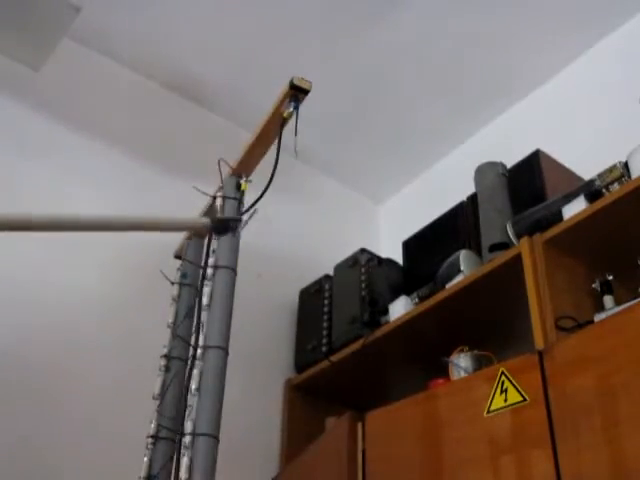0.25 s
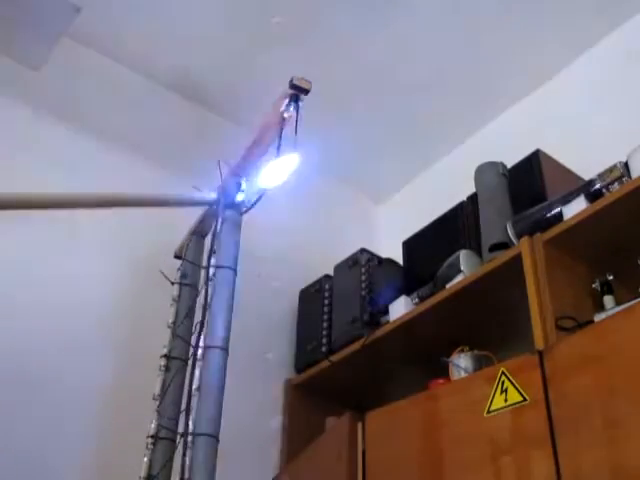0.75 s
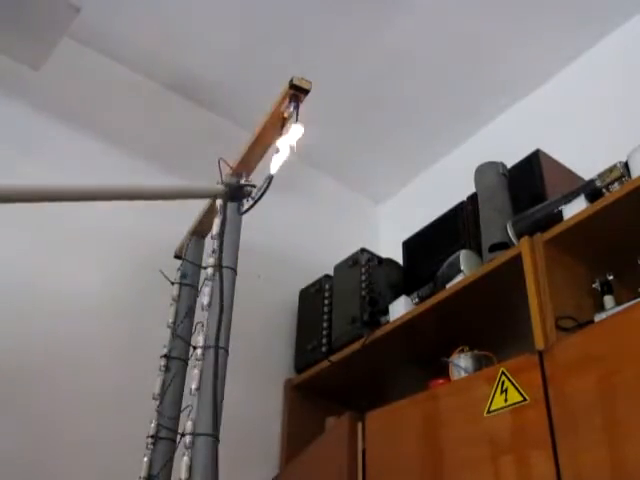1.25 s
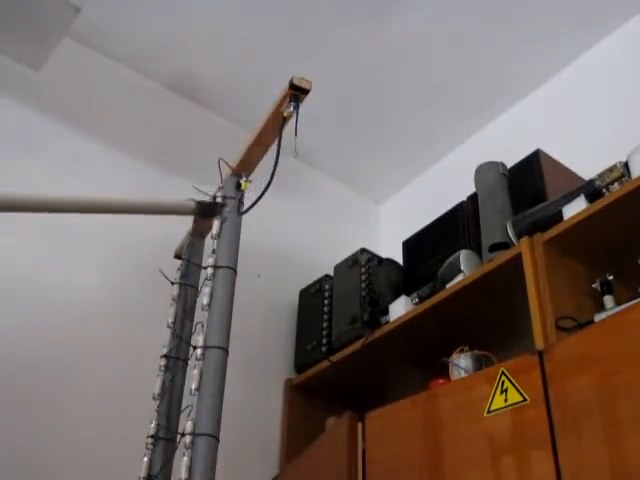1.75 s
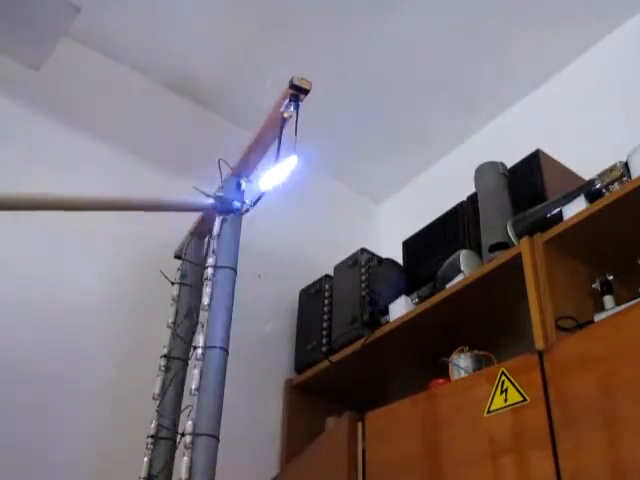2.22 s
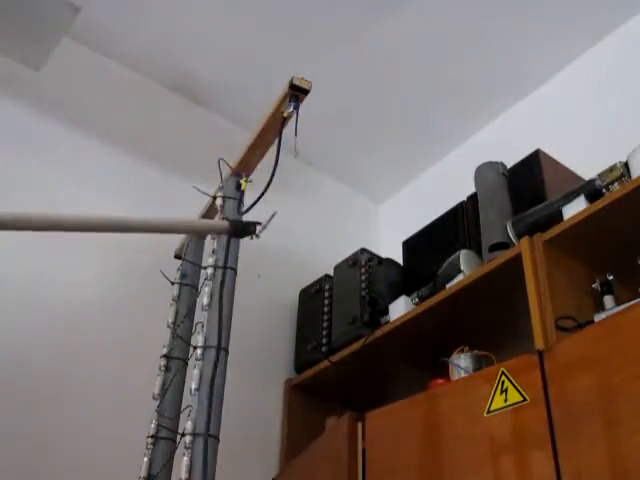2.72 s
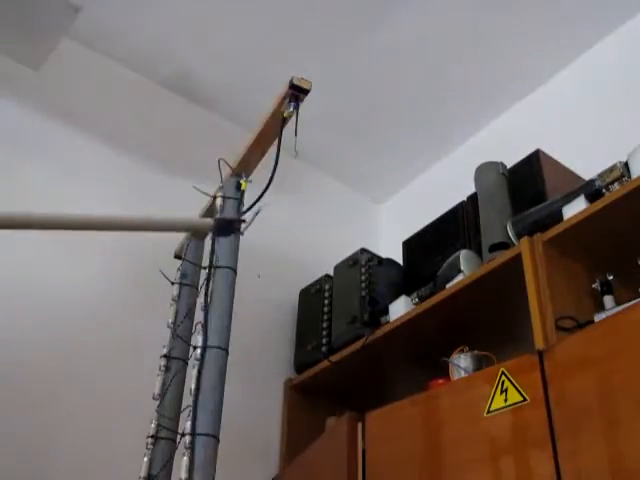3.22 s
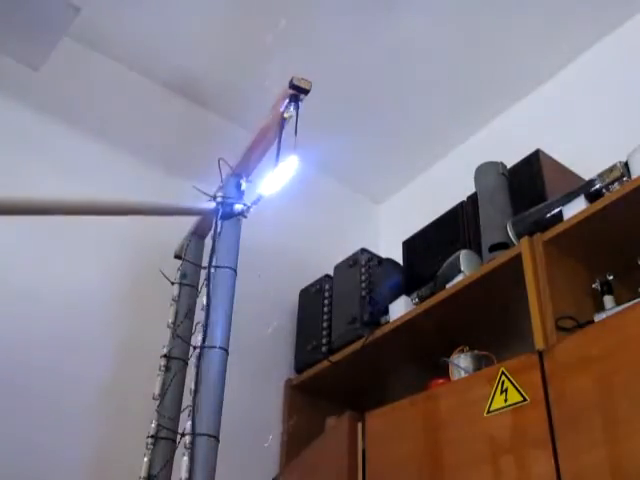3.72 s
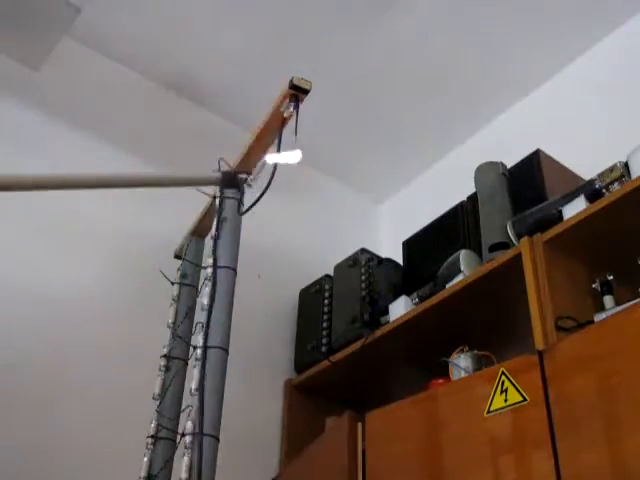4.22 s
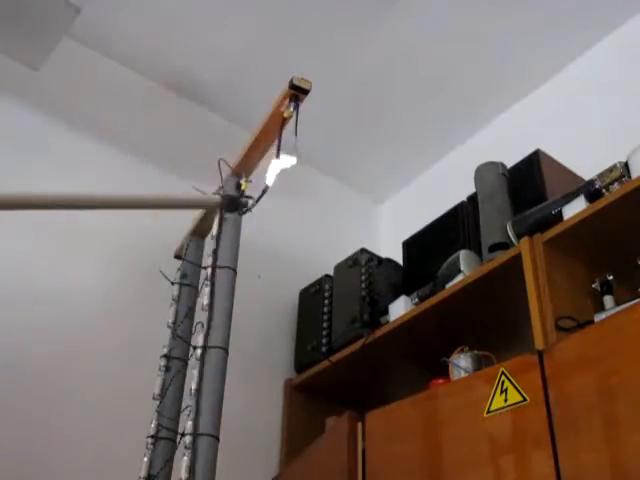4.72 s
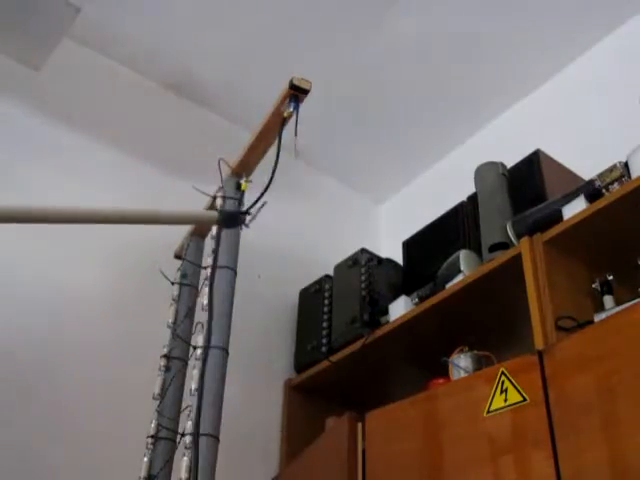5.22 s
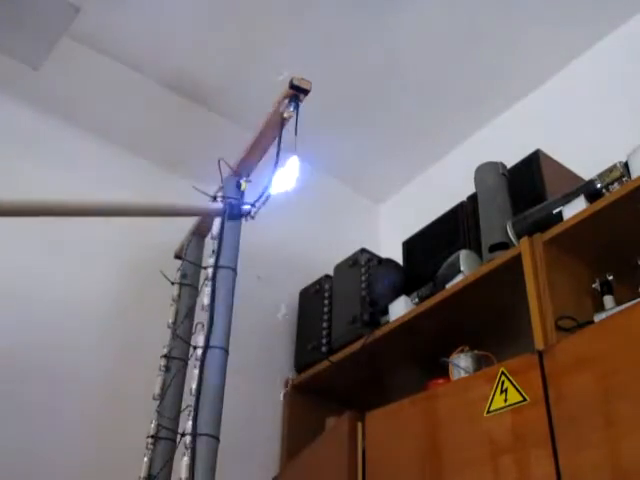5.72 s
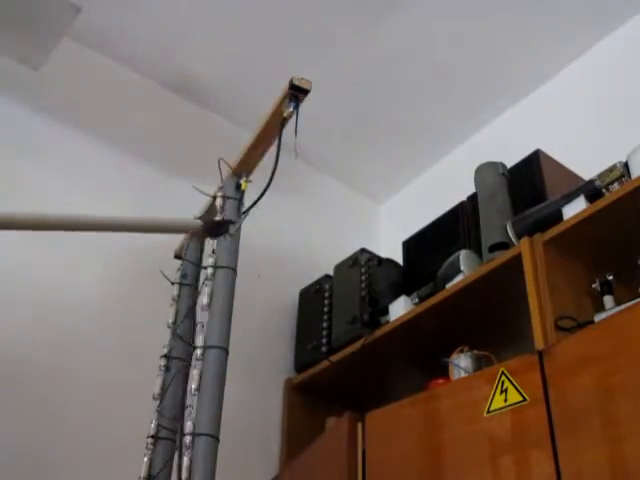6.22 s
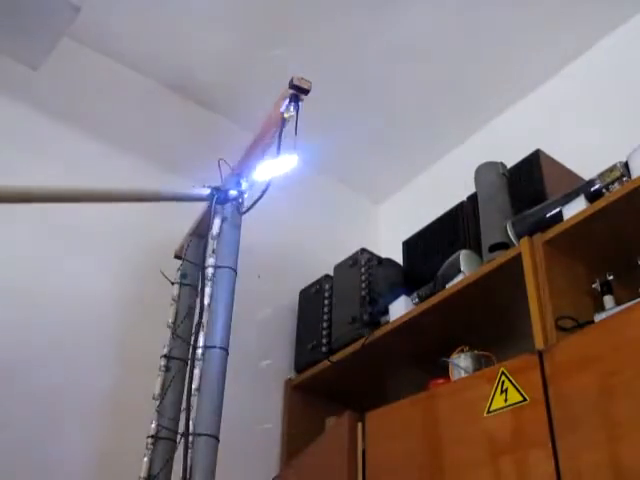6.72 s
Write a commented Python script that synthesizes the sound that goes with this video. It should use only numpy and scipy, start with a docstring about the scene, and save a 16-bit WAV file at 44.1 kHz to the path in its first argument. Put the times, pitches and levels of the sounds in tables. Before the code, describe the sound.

Irregular electrical sparking close up: dry short zaps alternate with long tearing buzzes, popping the microphone, over near silence in a live room.

```python
"""In a small, hard-walled room a homemade high-voltage supply arcs across a gap, close to a camera.
Short spits of uneven sparks alternate with long roaring arcs of thousands of sparks a second.
Now and then the sparks lock to the supply's oscillator and whistle; faint ticks and low tones join in.
Strong discharges couple into the microphone amplifier, which answers with dull pops.
Each spark is a click that rings the rig, then reaches two close-set microphones through the room."""
import sys
import numpy as np
from scipy import signal
from scipy.fft import rfft, irfft
from scipy.io import wavfile
from scipy.ndimage import uniform_filter1d

SR = 44100
rng = np.random.default_rng(int(sys.argv[2]) if len(sys.argv) > 2 else 0)


def wav_record(signal):
    """Record a signal, one row per channel, as 16-bit PCM in the file named by sys.argv[1]."""
    frames = np.transpose(np.atleast_2d(signal))
    bounded = np.clip(frames, -1, 1)
    # unit amplitude maps onto the largest positive 16-bit level
    quanta = np.round(bounded * 32767).astype(np.int16)
    wavfile.write(sys.argv[1], SR, quanta)


N = 306495
TIME = np.arange(N) / SR

# Long arcs across the gap. Each row: start in seconds, end in seconds, relative level in dB,
# swell time in seconds, fade time in seconds.
ARCS = [(0.574, 0.761, -14, 0.0027, 0.077), (2.04, 2.344, -15.5, 0.0016, 0.023),
        (2.641, 3.03, -12.5, 0.075, 0.21), (3.332, 3.999, -15, 0.0064, 0.038),
        (5.53, 5.896, -15, .03, 0.16), (6.397, 6.755, -14.5, 0.0022, 0.066)]
# sparks a second at the median wait, in the thinnest and the densest spits
THIN_PER_S, DENSE_PER_S = 800, 2200
# delay in samples that leaves room for the casing's smear ahead of the direct sound
LEAD = 32


def amp(db):
    """Decibels to gain."""
    return 10 ** (np.asarray(db) / 20)


def evened(x):
    """Scales to rms 1."""
    return x / np.sqrt(np.mean(x ** 2) + 1e-20)


def read(points, hz):
    """Reads a table on a log-frequency axis."""
    f, value = np.transpose(points)
    return np.interp(np.log(hz + 1), np.log(f + 1), value)


def add(mix, s, sound):
    """Mixes a sound in at time s."""
    part = mix[..., max(round(s * SR), 0):][..., :sound.shape[-1]]
    part += sound[..., :part.shape[-1]]


def floor(level_db=-64):
    """Faint steady room noise and amplifier hiss, partly shared by the two microphones."""
    # Colour of the quiet room and the hiss. Each row: frequency in Hz, relative level in dB per Hz.
    quiet_colour = [(10, -26), (26, -4.5), (50, -15), (95, -21), (150, -10), (260, -18.5), (500, -15.5),
                    (1400, -23.5), (3000, -21), (6000, -22.5), (12000, -29.5), (16000, -35.5)]
    gain = amp(read(quiet_colour, np.fft.rfftfreq(N, 1 / SR)))
    noise = irfft(rfft(rng.standard_normal((3, N))) * gain, N)
    own, shared = noise[:2], noise[2]
    return amp(level_db) * evened(own + 0.5 * shared)


def sparks(length, rate, jitter, spread_db):
    """The gap charges and breaks down again at uneven intervals; a longer wait gives a stronger spark."""
    count = 6000
    wait, luck = rng.standard_normal((count, 2)).T
    wait = np.exp(jitter * wait)  # median 1, so rate is the inverse of the median wait
    at = np.round((np.cumsum(wait) - wait[0]) / rate * SR).astype(int)  # the first spark is at once
    strength = np.sqrt(wait) * amp(spread_db * luck)
    n = max(round(length * SR), 2)
    inside = at < n
    return np.bincount(at[inside], strength[inside], n)


def spits(first_db=-12):
    """Each spit swells as its sparks stretch, then breaks off; the brighter it is, the faster it sparks."""
    # Short spits. Each row: start in seconds, length in seconds, relative level in dB,
    # share of dense bright sparks from 0 to 1.
    bursts = [(.054, .008, -21.5, 0.1), (0.084, 0.0097, -19, .4), (1.083, 0.0049, -27.5, 0.82),
              (1.147, 0.0069, -41, .4), (1.223, 0.0057, -21.5, 0.18), (1.414, 0.0086, -18.5, 0.53),
              (1.467, 0.012, -26, 0.62), (1.544, .014, -21, 0.29), (1.574, .02, -24, .7),
              (2.0007, .0086, -10.5, 0.36), (4.335, 0.0093, -26.5, 0.48), (4.354, .024, -30, 0.86),
              (4.489, 0.0086, -22.5, 0.89), (4.572, 0.0054, -37, 0.87), (4.723, .003, -46.5, 0.13),
              (4.886, 0.0073, -23, 0.57), (4.952, .017, -22.5, .5), (4.972, 0.033, -20.5, 1),
              (5.1256, 0.0033, -16.5, 0.54), (5.131, 0.024, -20.5, 0.98), (5.512, 0.0038, -15.5, 0.47),
              (6.869, 0.012, -23, 0.75), (6.913, 0.012, -18.5, 0.87), (6.925, 0.02, -18, 0.97)]
    thin, dense = np.zeros((2, N))
    for start, length, db, share in bursts:
        share = np.clip(share, 0, 1)
        rate = THIN_PER_S * (DENSE_PER_S / THIN_PER_S) ** share
        train = sparks(length, rate, jitter=.55, spread_db=2)
        swell = amp(np.linspace(first_db, 0, len(train)))
        train = amp(db) * evened(train * swell)
        add(thin, start, (1 - share) * train)
        add(dense, start, share * train)
    return thin, dense


def crack(clicks, colour, size=4096):
    """Turns each click into a sharp causal crack of unit energy that rings the nearby resonances."""
    # Resonances and dips of the rig and its surroundings. Each row: frequency in Hz, width in Hz,
    # lift in dB.
    body = [(573, 150, 3), (1755, 65, -3), (2576, 210, 2), (3030, 50, 1.5), (3460, 210, -1),
            (4194, 110, 6.5), (4270, 60, -1.5), (5040, 130, 3.5), (5610, 76, 4), (6000, 42, 8),
            (6750, 77, -9)]
    hz = abs(np.fft.fftfreq(size, 1 / SR))
    db = read(colour, hz)
    for f, width, lift in body:
        db = db + lift / (1 + (2 * (hz - f) / width) ** 2)
    # minimum phase puts the energy right after the click
    spectrum = np.exp(np.conj(signal.hilbert(np.log(amp(db)))))
    shape = np.fft.ifft(spectrum).real[:size // 2]
    return signal.oaconvolve(clicks, shape / np.linalg.norm(shape))[:N]


def casing(scatter=0.65, scatter_s=0.00038, above_hz=3100, size=512):
    """Treble scatters off the camera body and reaches each microphone smeared in its own way."""
    response = scatter * rng.standard_normal((2, size)) * np.exp(-TIME[:size] / scatter_s)
    highpass = signal.butter(4, above_hz, "high", fs=SR, output="sos")
    response = signal.sosfilt(highpass, response)
    response[:, 0] += 1
    z = rfft(np.roll(response, LEAD, axis=1))
    return irfft(z / (abs(z) + 1e-9))  # the smear leaves the colour as it is


def room(x, tail_db, direct_db=-4, gap_s=0.0013, low_hz=45):
    """One path to the camera: direct sound, near reflections and a diffuse tail that differs by microphone."""
    # Decay of the room. Each row: frequency in Hz, time to fall 60 dB in seconds.
    decay = [(150, 0.08), (400, 0.19), (1000, 0.37), (2800, 0.34), (7000, 0.36), (11000, 0.33),
             (16000, 0.26)]
    # Likeness of the tail at the two close-set microphones. Each row: frequency in Hz,
    # likeness from 0 to 1.
    likeness = [(100, 1), (900, 0.83), (1900, 0.8), (2700, 0.4), (4000, 0.03)]
    # Near reflections. Each row: delay in seconds, left gain, right gain, both relative to the direct sound.
    reflections = [(.000408, 0.064, 0.18), (.000726, 0.061, 0.3), (.00113, 0.05, 0.12),
                   (.00229, 0.055, 0.75), (.0029, .25, 1), (.00846, 0.22, 0.56)]
    # scattered taps of random sign, faded at each frequency by the room's decay
    count, step = 1500, 14
    taps = np.zeros((2, count * step))
    at = np.arange(count) * step + rng.integers(0, step, (2, count))
    np.put_along_axis(taps, at, rng.choice([-1., 1.], at.shape), 1)
    hz, t, z = signal.stft(taps, SR, nperseg=256)
    z = z * amp(-60 * t / read(decay, hz)[:, None])
    alike = np.clip(read(likeness, hz), 0, 1)[:, None]
    z[1] = alike * z[0] + np.sqrt(1 - alike ** 2) * z[1]
    tail = signal.istft(z, SR)[1]
    tail = tail * (1 - np.exp(-(TIME[:tail.shape[1]] / gap_s) ** 2))  # the tail builds up late
    response = amp(tail_db) * tail / np.linalg.norm(tail, axis=1, keepdims=True)
    response[:, 0] += amp(direct_db)
    for delay, *sides in reflections:
        add(response, delay, amp(direct_db) * np.array(sides)[:, None])
    response = signal.fftconvolve(response, casing(), axes=1)
    # a spark radiates no steady pressure
    highpass = signal.butter(2, low_hz, "high", fs=SR, output="sos")
    response = signal.sosfilt(highpass, response)
    return signal.fftconvolve(x[None], response, axes=1)[:, LEAD:N + LEAD]


def ticks(length_s=.004, level_db=-52.5):
    """A few feeble sparks that fail to bridge the gap."""
    # Faint ticks, where the gap nearly breaks down. Each entry: start in seconds.
    starts = [.533, .557, 1.054, 1.946, 5.479]
    out = np.zeros(N)
    for start in starts:
        train = sparks(length_s, THIN_PER_S, jitter=.55, spread_db=2)
        add(out, start, amp(level_db) * evened(train))
    return out


def arc_level(t, length, db, swell_s, fade_s, swell_db=-4, sag_db=-5.5, out_db_per_s=-600):
    """Level in dB of an arc t seconds after its strike: it starts weak, holds, sags as it stretches, goes out."""
    swell = swell_db * np.exp(-t / swell_s)
    sag = sag_db * np.clip(1 - (length - t) / fade_s, 0, 1)
    return db + swell + sag + out_db_per_s * np.maximum(t - length, 0)


def arcs(rate=2400, strike_db=24, flutter_db=0.93, flutter_s=.008):
    """A first hard strike, then thousands of sparks a second whose strength flutters."""
    out = np.zeros(N)
    for start, end, *shape in ARCS:
        train = sparks(end - start + .06, rate, jitter=.6, spread_db=3)  # runs on while the arc goes out
        noise = rng.standard_normal(SR)
        flutter = evened(uniform_filter1d(noise, max(int(flutter_s * SR), 1)))[:len(train)]
        train = evened(train * amp(flutter_db * flutter))
        train[0] = amp(strike_db)
        level = arc_level(TIME[:len(train)], end - start, *shape)
        add(out, start, train * amp(level))
    return out


def pop(hold_s, left, release_s=0.0013):
    """A discharge throws the amplifier to one side; it sticks, then lets go."""
    late = np.maximum(TIME[:SR // 20] - hold_s, 0)
    sides = np.array([[np.clip(left, 0, 1)], [1]])
    return -sides * np.exp(-(late / release_s) ** 2)


def pops(full_height=.57, coupling_hz=14, lesser_hold_s=.0007, small_per_s=150, small_db=-19, left_db=-7):
    """Full pops, spells of lesser ones and small kicks, all overshooting through the coupling capacitor."""
    # Full pops. Each row: start in seconds, time spent saturated in seconds,
    # share that reaches the left from 0 to 1.
    full = [(0.611, .0016, 0.54), (2.01, 0.00044, 0.09), (2.1846, .0005, 0), (2.189, 0.0012, 0.02),
            (2.219, 0.00036, 0), (2.2524, 0.00028, .05), (2.3163, 0.0016, 0), (2.6594, 0.0015, 0),
            (2.6974, 0.00048, 0), (3, .0006, 0.25), (3.3441, 0.0036, 0), (3.636, .0004, 0.48),
            (3.6983, .0014, 0.6), (3.8123, .0005, 0.3), (4.9998, 0.0012, 0.08), (5.1407, 0.0029, 0),
            (5.539, 0.00097, 0), (5.6385, 0.0012, 0), (5.7373, 0.00075, 0), (5.7857, 0.002, 0),
            (5.8379, .0002, 0), (5.8609, .0008, 0.01), (6.461, 0.00026, 0.52), (6.4988, 0.0013, 0.43),
            (6.5221, .0013, .8), (6.6522, 0.00037, .75), (6.6865, 0.0014, 0.66), (6.7125, 0.00034, 1),
            (6.7349, 0.0015, 1), (6.8674, 0.0043, 0.8), (6.9194, 0.0043, .8), (6.9361, 0.0046, 0),
            (6.9457, .0046, 1)]
    # Spells of lesser pops at random moments. Each row: start in seconds, end in seconds,
    # pops a second at the median wait, typical height, share that reaches the left from 0 to 1.
    spells = [(2.051, 2.34, 17, 0.29, 0.22), (2.676, 2.78, 29, 0.4, 0), (3.351, 3.52, 39.6, 0.37, 0.01),
              (3.748, 3.83, 38, 0.33, 0.2), (5.545, 5.8, 28, 0.34, 0.01), (6.612, 6.755, 70, 0.43, 0.33),
              (6.916, 6.944, 130, 0.41, 0.25)]
    out = np.zeros((2, N))
    for s, hold_s, left in full:
        add(out, s, full_height * pop(hold_s, left))
    for start, end, rate, height, left in spells:
        train = sparks(end - start, rate, jitter=.4, spread_db=2)
        lesser = signal.fftconvolve(train[None], pop(lesser_hold_s, left), axes=1)
        add(out, start, height * lesser)
    # weaker kicks come at random from an arc's strike until halfway through its fade, mostly on the right
    burning = sum((TIME > start) & (TIME < end - fade_s / 2) for start, end, _, _, fade_s in ARCS)
    struck = rng.random((2, N)) < small_per_s / SR
    kicks = burning * struck * rng.uniform(.3, 1, (2, N))
    recovery = np.exp(-TIME[:SR // 20] / 0.001)
    kicks = signal.oaconvolve(kicks, recovery[None])[:, :N]
    out -= amp(small_db) * amp([[left_db], [0]]) * kicks
    highpass = signal.butter(2, coupling_hz, "high", fs=SR, output="sos")
    return signal.sosfilt(highpass, out)


def hums(waver=0.023):
    """A soft, wavering low tone that swells and fades as the two whistling arcs die."""
    # Faint low tones. Each row: start in seconds, end in seconds, relative level in dB, pitch in Hz.
    tones = [(.72, .88, -48.5, 541), (3.92, 4.084, -49, 542)]
    out = np.zeros(N)
    for start, end, db, hz in tones:
        n = max(round((end - start) * SR), 2)
        drift = evened(uniform_filter1d(rng.standard_normal(SR), size=300))[:n]
        tone = np.sin(2 * np.pi * np.cumsum(hz * (1 + waver * drift)) / SR)
        add(out, start, amp(db) * evened(tone * np.hanning(n)))
    return out


def whistles(oscillator_hz=23850, octave_db=-6):
    """Sparks on every third or fourth cycle give an unsteady tone; the lower one has an audible octave."""
    # Whistles, where the sparks lock to the supply's oscillator. Each row: start in seconds,
    # end in seconds, relative level in dB, oscillator cycles per spark, rms pitch waver as a share.
    locked = [(.73, .87, -32, 3, .01), (.76, .845, -28, 4, .009), (.895, .93, -37, 4, .006),
              (3.98, 4.075, -30.5, 3, .008), (4.361, 4.379, -22, 3, .024), (4.366, 4.395, -17.5, 4, .04),
              (4.491, 4.505, -22, 4, .04)]
    out = np.zeros(N)
    for start, end, db, cycles, waver in locked:
        n = max(round((end - start) * SR), 2)
        hz = oscillator_hz / max(round(cycles), 2)
        noise = rng.standard_normal((2, SR // 4))
        drift, flicker = evened(uniform_filter1d(noise, size=45))[:, :n]
        phase = 2 * np.pi * np.cumsum(hz * (1 + waver * drift)) / SR
        octave = (cycles > 3.5) * amp(octave_db) * np.sin(2 * phase)
        tone = np.sin(phase) + octave
        envelope = (1 + .5 * flicker) * signal.windows.tukey(n, .5)
        add(out, start, amp(db) * evened(tone * envelope))
    return out


def scene(spit_db=2, arc_db=0, pop_db=0, left_db=1.4, count=3):
    """The spark channel jumps about, so each spark takes one of a few paths; pops arise in the camera, dry."""
    # Colours of dense and of sparse sparks. Each row: frequency in Hz, relative level in dB per Hz.
    dense_colour = [(30, -23.5), (120, -16), (300, -10), (700, -10), (1200, -9.5), (1900, -6.5), (2800, -4),
                    (4500, -3), (7300, -3), (10000, -6.5), (13000, -9), (16000, -11.5)]
    sparse_colour = [(30, -33), (130, -27.5), (370, -14), (700, -3.5), (1240, -7.5), (1800, -2.5),
                     (2600, 1.5), (4300, 2.5), (8000, -2.5), (12800, -7), (16000, -18)]
    thin, dense = amp(spit_db) * np.array(spits())
    thin = thin + ticks()
    dense = dense + amp(arc_db) * arcs()
    path = rng.integers(0, count, N)
    air = np.zeros((2, N))
    for k in range(count):
        cracks = crack(thin * (path == k), sparse_colour) + crack(dense * (path == k), dense_colour)
        air = air + room(cracks, tail_db=-2.0)
    air = air + room(whistles() + hums(), tail_db=-5)
    return air * amp([[left_db], [0]]) + amp(pop_db) * pops() + floor()


def record(dry, limit=.88, edge_hz=15900):
    """The amplifier rounds off the tallest peaks; then the band limit."""
    rounded = dry / (1 + (dry / limit) ** 4) ** .25
    band = signal.firwin(511, edge_hz, window=("kaiser", 9), fs=SR)
    return signal.oaconvolve(rounded, band[None], "same")


dry = scene()
out = record(dry)
wav_record(out)
```